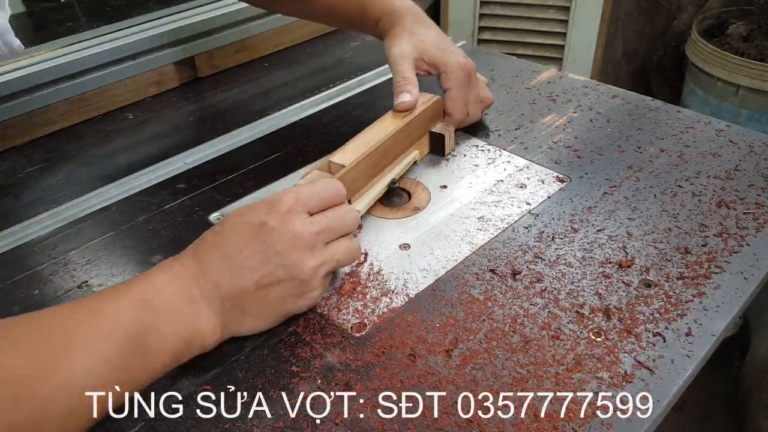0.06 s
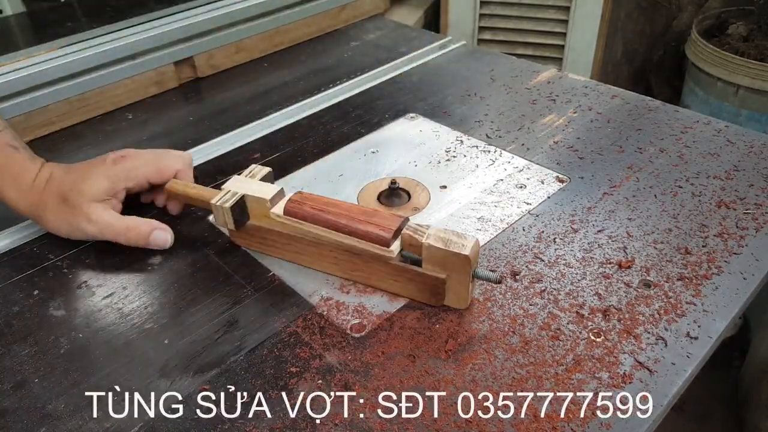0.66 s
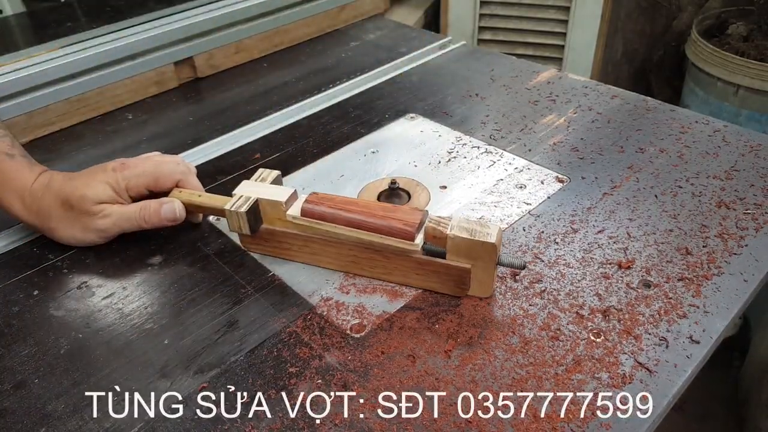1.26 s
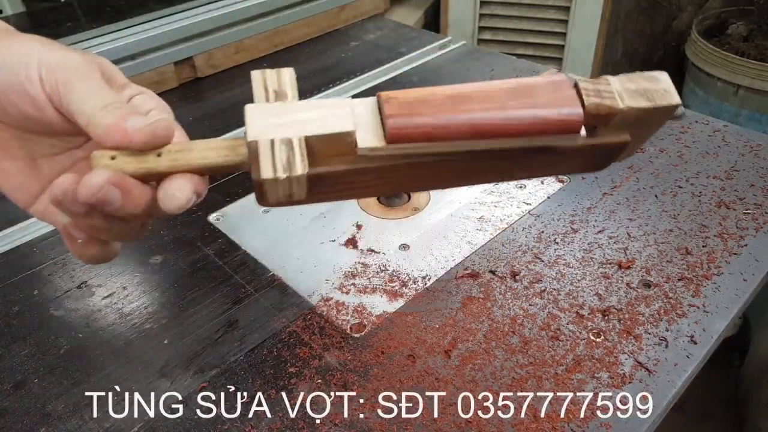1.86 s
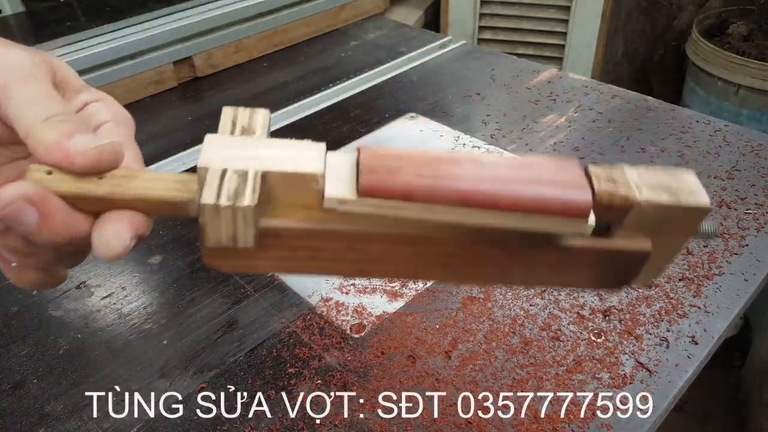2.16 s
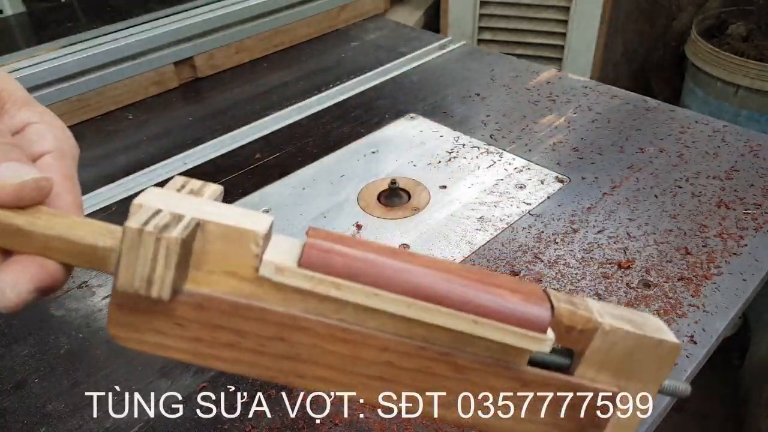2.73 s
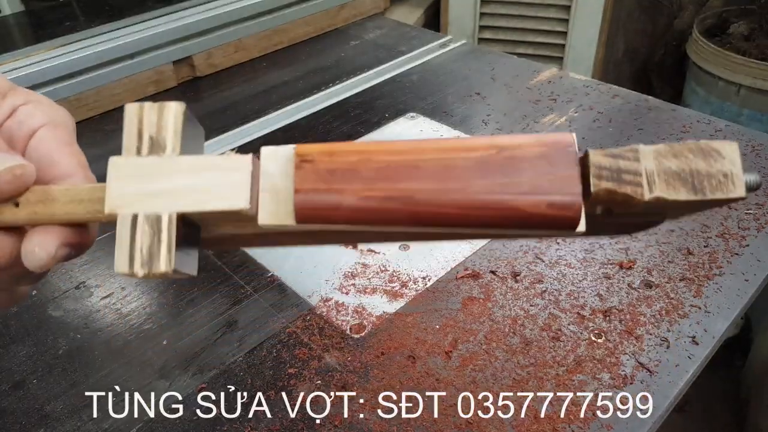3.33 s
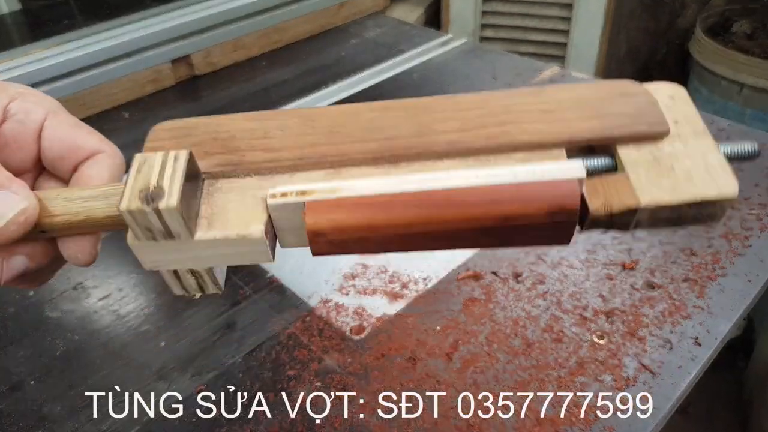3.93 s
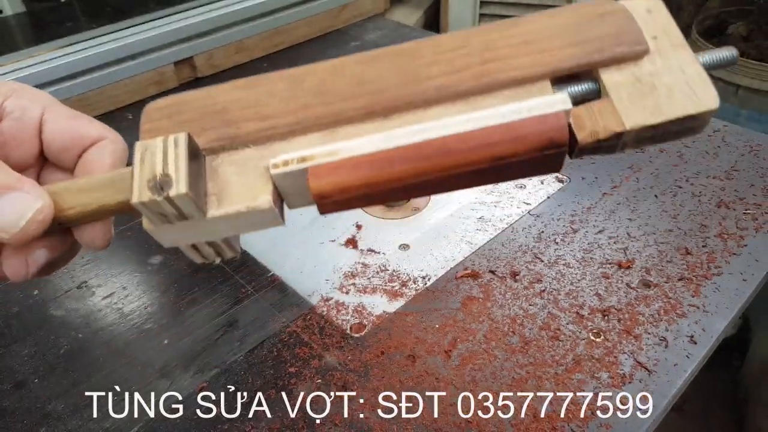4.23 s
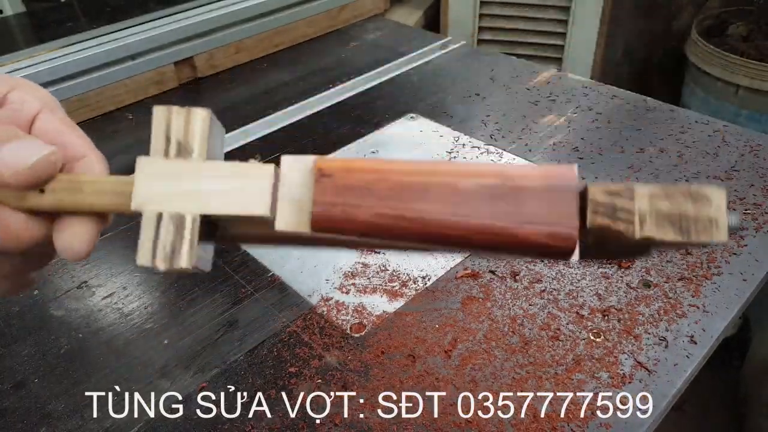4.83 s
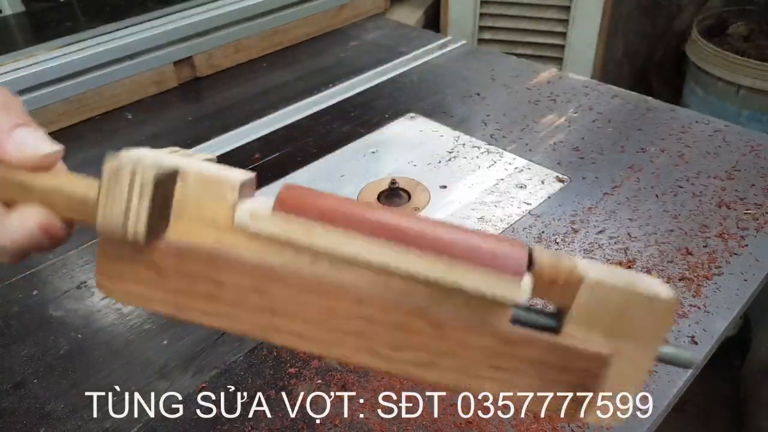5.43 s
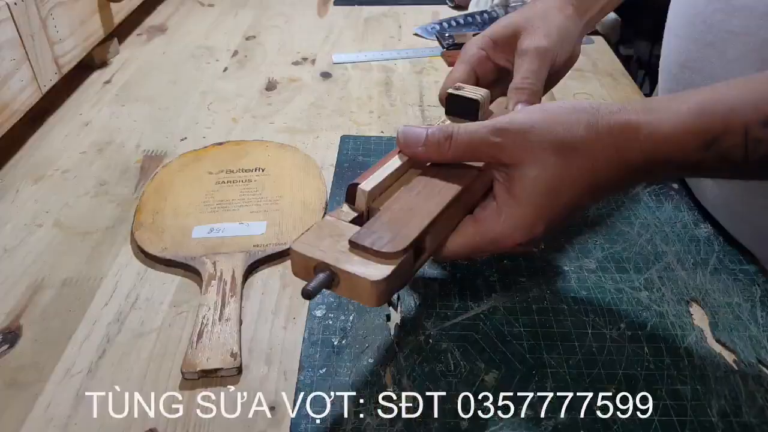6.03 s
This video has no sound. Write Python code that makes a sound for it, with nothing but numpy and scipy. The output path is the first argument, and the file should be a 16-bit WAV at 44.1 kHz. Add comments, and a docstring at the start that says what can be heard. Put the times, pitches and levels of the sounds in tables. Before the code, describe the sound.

In a workshop, a table-mounted router bites into hardwood with a brief, shrill buzz and squeal, then runs free with a steady hum and rushing fan air. It is switched off and coasts, its hum sinking in pitch over a dry, fading bearing hiss. Faint scrapes and a single wooden knock on the table follow, before the sound cuts to a quiet room with a few light taps. Heard close, in stereo.

```python
"""Workshop: a router under a table trims a hardwood strip, runs free and is switched off.
The bit strikes the wood once a turn, buzzing and squealing over shaft hum and fan air.
A jump to later in the spin-down: hum and ball-bearing tone sink through the table's resonances,
over a dry bearing rush and faint scrapes. The wooden jig knocks the table once.
A last jump lands in the quiet shop, with a few light handling taps."""
import sys
import numpy as np
from scipy import signal
from scipy.fft import rfft, irfft, next_fast_len
from scipy.io import wavfile

SR = 44100
rng = np.random.default_rng(int(sys.argv[2]) if len(sys.argv) > 2 else 0)


def file_out(sig):
    """Save sig as 16-bit WAV at sys.argv[1]."""
    # one column per channel
    cols = np.atleast_2d(sig).T
    # limit, then scale
    lim = np.clip(cols, -1, 1)
    pcm = np.round(lim * 32767).astype(np.int16)
    wavfile.write(sys.argv[1], SR, pcm)


N = 272960
TIME_S = np.arange(N) / SR
JUMP_TO_COAST_S, JUMP_TO_QUIET_S = 1.641, 6.067
# coasting: drive level at REF_SPEED_RPS, loss per halving of speed
REF_SPEED_RPS, SHAFT_DB = 200, -41
BALL_DB, BALL_LOSS_DB = -38.5, 17.5
FAN_DB, FAN_LOSS_DB = -54.5, 14
RUSH_DB, RUSH_LOSS_DB = -44.5, 12
HISS_DB, HISS_LOSS_DB, SIZZLE_LOSS_DB = -46, 11, 3.5
BALL_PASSES_PER_TURN, FAN_BLADES = 3.086, 11

# shaft, powered to just past switch-off: time_s, speed_rps
RUN_SPEED_CURVE = [(0, 416.5), (.27, 413.8), (.55, 427.6), (.9, 432.9), (1.31, 435.5), (1.4, 416),
                   (1.46, 395.5), (1.64, 341)]
# shaft hum, swelling as the speed starts to fall: time_s, level_db
RUN_HUM_CURVE = [(0, -38.5), (.26, -40.5), (.5, -42.5), (.72, -39), (1.35, -38), (1.47, -30), (1.51, -32),
                 (1.56, -37.5), (1.64, -42)]
# hum overtones: cycles_per_turn, free_db, cutting_db, flutter_db
HUM_OVERTONES = [(2, -58.5, -54, 2), (3, -50.5, -45.5, 5), (4, -51.5, -50.5, 3.5), (5, -59.5, -55, 3.5)]
# weak whines under power: cycles_per_turn, level_db
RUN_WHINES = [(3.086, -62), (6, -60), (10, -73), (11, -63.5)]
# fan air, up as the jig uncovers the opening, down after switch-off: time_s, level_db
AIR_CURVE = [(0.31, -49), (0.45, -45.5), (0.68, -42), (1.34, -42.5), (1.5, -44.5), (1.64, -45)]
# fan air: freq_hz, gain_db
AIR_SPECTRUM = [(20, -15), (60, -15), (130, -14.5), (300, -2.5), (450, 4), (600, -2), (1200, 1.5),
                (1900, -1.5), (2600, 1.5), (4100, 4), (4800, 0.5), (6300, -4), (9000, -2.5), (12500, -3.5),
                (15500, -8)]
# cutting buzz: time_s, level_db
BUZZ_CURVE = [(0.0, -47.5), (0.024, -35.5), (0.074, -45), (0.108, -40.5), (0.158, -45), (0.27, -42.5),
              (0.284, -62.5)]
# cutting buzz: freq_hz, gain_db
BUZZ_SPECTRUM = [(2200, -2), (2900, -6), (3700, 6), (4400, -4), (5000, 9.5), (6200, 1), (7400, 4),
                 (8300, 6.5), (10000, -2), (11600, -5), (12600, -15), (14000, -16), (15600, -13)]
# resonances the cutter sets squealing: pitch_hz, width_hz, level_db, peak_s, sigma_s
SQUEAL_MODES = [(3010, 130, -41.5, 0.069, 0.053), (5540, 300, -45, 0.081, 0.029),
                (7000, 270, -58, 0.085, 0.016), (9100, 300, -37, 0.11, 0.027),
                (10620, 240, -39, 0.14, .025), (9240, 400, -36.5, 0.23, 0.036),
                (10500, 270, -35, 0.273, 0.039)]

# shaft, coasting: time_s, speed_rps
COAST_SPEED_CURVE = [(1.64, 304.6), (2, 287), (2.5, 263), (3, 241), (3.5, 219), (4, 199), (4.5, 180.3),
                     (5, 161), (5.5, 143.3), (6.07, 121.8)]
# shaft chatter in the bearings: time_s, gain_db
CHATTER_CURVE = [(1.7, 6.5), (1.84, 4.5), (2.0, -1.5), (2.6, -5), (4.2, -5.5), (4.5, 5), (5.35, 2.5),
                 (5.75, -4), (6.05, -9.5)]
# chatter overtones: cycles_per_turn, level_db
CHATTER_OVERTONES = [(2, -48.5), (3, -45), (4, -46), (5, -50.5), (6, -52)]
# weak bearing tones: cycles_per_turn, level_db
BEARING_LINES = [(2.086, -58), (4.086, -59.5), (5.086, -83), (6.172, -58), (10.258, -60.5)]
# table and cabinet resonances: centre_hz, width_hz, gain_db
TABLE_RESONANCES = [(120, 22, 8.5), (153, 14, -2.5), (185, 12.5, 1.5), (212, 13, 4.5), (244.6, 7, 4.5),
                    (274.3, 39, 5.5), (357.5, 43, 5.5), (403, 34, 9.5), (532, 23, -4), (600.7, 38, 3.5),
                    (692, 46, 1.5), (765, 19, 6), (872, 19.4, -2), (1400, 99, 5.5)]
# cancellations by reflection: centre_hz, width_hz, loss_db
TABLE_NULLS = [(146, 1.2, 15), (172.4, 6.9, 10), (430.3, 4.9, 10), (604, 14.4, 11), (738.8, 6.4, 15)]
# bearing rush: freq_hz, gain_db
RUSH_SPECTRUM = [(900, -7), (1200, -13.5), (1470, -4.5), (1700, -6), (1920, -3.5), (2250, 1), (2600, -2.5),
                 (2950, -5.5), (3300, -5), (3800, -8.5), (4400, -10), (5700, -33)]
# bearing rasp: cycles_per_turn, half_width_hz, re_rush_db
RASP_BANDS = [(8.2, 180, -11), (18.1, 320, -9)]
# housing ring: time_s, level_db
HOUSING_CURVE = [(1.67, -42.5), (2.1, -42.5), (2.9, -47), (3.3, -51.5), (4.3, -54), (5.4, -57), (6.04, -66)]
# housing ring: freq_hz, gain_db
HOUSING_SPECTRUM = [(3800, -23), (4350, -7), (4800, 3), (5050, -0.5), (5250, 5.5), (5450, 2.5), (5800, -1),
                    (6600, -6)]
# bearing hiss: freq_hz, gain_db
HISS_SPECTRUM = [(3350, -38), (5700, -11), (6650, -5.5), (9230, -2.5), (10400, 0), (13000, -3.5),
                 (15100, -4), (15800, 0.5)]
# thin bearing whistles at full hiss: cycles_per_turn, level_db
BEARING_WHISTLES = [(36, -61), (41, -58), (44, -59.5), (47, -60), (53, -59), (56, -56), (72, -59)]
# insert plate rung by bearing sizzle: pitch_hz, width_hz, level_at_ref_speed_db
PLATE_MODES = [(10500, 100, -61), (11600, 230, -58), (15400, 500, -57)]
# motor housing and insert plate resonances: centre_hz, width_hz, lift_db
BODY_RESONANCES = [(1220, 31, 14.5), (1376, 68, 6.5), (1835, 50, 6.5), (2030, 50, 6.5), (2107, 43, 4.5),
                   (2475, 54, 3), (2694, 37, 7.5), (2894, 46, 5.5), (2975, 40, 5.5), (3670, 72, 3.5),
                   (4087, 90, 8), (4730, 64, 5.5), (4940, 76, 6), (5060, 80, 6)]
# low table noise: freq_hz, gain_db
TABLE_SPECTRUM = [(25, -24), (55, -13.5), (85, -11), (110, 3.5), (140, -7), (200, -4.5), (400, -1.5),
                  (600, 0.5), (900, 0), (1200, -8.5), (1700, -1.5)]

# jig contacts with the table: start_s, impulse_db, brightness_hz
JIG_CONTACTS = [(5.902, -33, 1100), (5.909, -57, 800), (5.927, -49, 700)]
# jig and table top: pitch_hz, gain_db, t60_s
JIG_MODES = [(410, 4, 0.046), (487, 6, 0.049), (623, 4.5, 0.076), (777, -7, 0.12), (1000, -4, 0.04),
             (1900, -16, .02), (2850, -12, .015)]
# faint scrapes: peak_s, level_db, sigma_s
SCRAPE_EVENTS = [(5.242, -45.5, 0.01), (5.298, -48, 0.024), (5.40, -50, 0.0092), (5.485, -47, 0.039),
                 (5.60, -48, .014), (5.705, -47, 0.0087)]
# scrape ring: pitch_hz, width_hz, relative_db
SCRAPE_RESONANCES = [(4390, 70, 16), (4600, 200, -3), (5000, 120, 3), (5300, 110, 7)]
# handling taps: start_s, level_db, decay_s
TAP_EVENTS = [(6.069, -41, 0.0086), (6.096, -48, .005), (6.122, -41, 0.0088), (6.132, -47.5, 0.0068),
              (6.176, -45, 0.015)]
# handling taps: freq_hz, gain_db
TAP_SPECTRUM = [(200, -8), (1000, 2), (1900, 0), (2500, -3), (4000, -7), (6000, -18), (9000, -11),
                (11000, -15), (13500, -11), (15000, -25)]
# room noise: freq_hz, gain_db
ROOM_SPECTRUM = [(25, -15), (110, 6), (250, -9), (500, -2), (1000, -11), (2000, -13), (4000, -24),
                 (7000, -37), (15000, -38)]
# left-right likeness: freq_hz, correlation
STEREO_CORRELATION = [(60, 1), (130, 0.5), (290, 0.64), (640, -0.23), (1400, -0.051), (15000, 0.034)]
# balance: freq_hz, left_minus_right_db
STEREO_BALANCE = [(110, 0.5), (250, .5), (280, -4.5), (312, 5), (345, -10.5), (385, 0), (430, -11),
                  (520, -3.5), (700, -0.5), (780, 5), (870, -10), (960, -2.5), (1300, -2), (2400, -3),
                  (4400, -4), (8100, -5), (15000, -8.5)]
# tone phase between the sides: freq_hz, left_lead_rad
STEREO_PHASE = [(120, -.2), (210, 0), (290, -.55), (335, -2), (385, -.5), (430, -1.06), (560, -.3),
                (700, -1.1), (780, -0.65), (870, -2.6), (1400, -2.18), (5000, 0.06)]


def running_router():
    """Shaft hum, fluttering overtones, whines that ring the housing, fan air and the end of the cut."""
    speed_rps = curve(RUN_SPEED_CURVE)
    air_db = curve(AIR_CURVE)
    covered_db = air_db - air_db.max()
    in_wood = until(0.27, fade_s=0.11)
    hum = shaft_tone(speed_rps, 1, curve(RUN_HUM_CURVE), waver_db=0.84)
    for per_turn, free_db, cutting_db, flutter_db in HUM_OVERTONES:
        running_free_db = free_db + 2.3 * covered_db  # 2.3 dB per dB of fan air
        level_db = in_wood * cutting_db + (1 - in_wood) * running_free_db
        hum += shaft_tone(speed_rps, per_turn, level_db, flutter_db)
    whines = motor_body(from_db(covered_db) * side_tones(speed_rps, RUN_WHINES, wet_db=-2.5))
    rush = rubbing(speed_rps, whine_db=-9.5, throb=0.14, harmonics=24)
    air = from_db(air_db) * coloured(rush, AIR_SPECTRUM)
    return hum + whines + air + cutting(speed_rps)


def cutting(speed_rps):
    """The edge strikes the wood once a turn; as the grip shifts, different resonances squeal."""
    turns = shaft_turns(speed_rps, jitter=0.0016, rate_hz=60)
    blows = turn_force(turns, scatter=0, harmonics=38) * from_db(drift(200) + drift(40))
    blows = reflections(blows, t60_s=0.014, wet_db=11)  # smeared by workpiece and plate
    buzz = from_db(curve(BUZZ_CURVE)) * coloured(blows, BUZZ_SPECTRUM)
    squeal = sum(from_db(db) * swell(peak_s, sigma_s) * resonance(blows, hz, width_hz)
                 for hz, width_hz, db, peak_s, sigma_s in SQUEAL_MODES)
    cut = (buzz + squeal) * until(0.275, fade_s=0.008)
    feed_bump = from_db(-55) * swell(peak_s=0.105, sigma_s=0.015) * np.sin(2 * np.pi * 200 * TIME_S)
    return reflections(cut, t60_s=0.033, wet_db=-15) + feed_bump


def coasting_router():
    """Bearing rush, fan tone, housing ring, hiss and sizzle fade over the hum and steady table noise."""
    speed_rps = curve(COAST_SPEED_CURVE)
    halvings = np.log2(REF_SPEED_RPS / speed_rps)
    rub = rubbing(speed_rps, whine_db=-6.5, throb=0.16, harmonics=50) * from_db(1.08 * drift(27))
    rasps = sum(from_db(db) * bearing_rasp(speed_rps, per_turn, half_width_hz)
                for per_turn, half_width_hz, db in RASP_BANDS)
    rush = from_db(RUSH_DB - RUSH_LOSS_DB * halvings) * (coloured(rub, RUSH_SPECTRUM) + rasps)
    fan = shaft_tone(speed_rps, FAN_BLADES, FAN_DB - FAN_LOSS_DB * halvings, waver_db=4)
    housing = from_db(curve(HOUSING_CURVE)) * coloured(rub, HOUSING_SPECTRUM)

    fine_rub = rubbing(speed_rps, whine_db=-4, throb=0.2, harmonics=90)
    hiss_db = HISS_DB - HISS_LOSS_DB * halvings
    hiss = from_db(hiss_db) * coloured(fine_rub, HISS_SPECTRUM)
    sizzle = from_db(-SIZZLE_LOSS_DB * halvings) * ring_modes(fine_rub, PLATE_MODES)
    whistles = side_tones(speed_rps, BEARING_WHISTLES, wet_db=-46)
    whistles *= from_db(hiss_db - hiss_db.max()) * pan(HISS_SPECTRUM[-1][0])

    motor = motor_body(fan + rush + housing + hiss + whistles)
    table_noise = from_db(-44.5) * coloured(white(), TABLE_SPECTRUM)
    return coasting_hum(speed_rps, halvings) + motor + sizzle + table_noise


def coasting_hum(speed_rps, halvings):
    """Shaft, ball-pass and chatter tones swell and fade as they sink through the table's resonances."""
    def through_table(per_turn, level_db, waver_db):
        return shaft_tone(speed_rps, per_turn, level_db + table_gain_db(per_turn * speed_rps), waver_db)
    chatter_db = curve(CHATTER_CURVE)
    shaft = through_table(1, SHAFT_DB, waver_db=1.5)
    ball = through_table(BALL_PASSES_PER_TURN, BALL_DB - BALL_LOSS_DB * halvings, waver_db=1.9)
    chatter = sum(through_table(per_turn, db + chatter_db, waver_db=2.5)
                  for per_turn, db in CHATTER_OVERTONES)
    return shaft + ball + chatter + side_tones(speed_rps, BEARING_LINES, wet_db=1.5)


def shaft_tone(speed_rps, per_turn, level_db, waver_db):
    """A line locked to the shaft; its stereo position shifts as it sweeps."""
    hz = per_turn * speed_rps
    phase_rad = 2 * np.pi * (np.cumsum(hz) / SR + rng.random())
    block_hz = hz[::32]
    position = pan(block_hz) * np.exp(1j * at_hz(STEREO_PHASE, block_hz) * [[0.5], [-0.5]])
    position = np.repeat(position, 32, axis=1)[:, :N]
    amplitude = np.sqrt(2) * from_db(level_db + waver_db * drift(8.1))
    return amplitude * np.real(position * np.exp(1j * phase_rad))


def side_tones(speed_rps, lines, wet_db):
    """Weak, unsteady tones; reflections make them waver as they move."""
    angle_rad = 2 * np.pi * shaft_turns(speed_rps, jitter=0.00118, rate_hz=19.6)
    tones = sum(from_db(db) * np.sin(per_turn * angle_rad + 2 * np.pi * rng.random())
                for per_turn, db in lines)
    return reflections(tones, t60_s=0.44, wet_db=wet_db)


def rubbing(speed_rps, whine_db, throb, harmonics):
    """Rush that swells once a turn, plus a whine from roughness that comes round again."""
    turns = shaft_turns(speed_rps, jitter=0.000786, rate_hz=20.2)
    roughness = turn_force(turns, scatter=1, harmonics=harmonics)
    whine = unit_rms(reflections(roughness, t60_s=0.1, wet_db=35))
    return white() * (1 + throb * np.sin(2 * np.pi * turns)) + from_db(whine_db) * whine


def bearing_rasp(speed_rps, per_turn, half_width_hz):
    """Narrow band of bearing noise; its centre follows the shaft."""
    lowpass = signal.butter(2, half_width_hz, fs=SR, output="sos")
    baseband = signal.sosfilt(lowpass, white() + 1j * white())
    carrier = np.exp(2j * np.pi * per_turn * np.cumsum(speed_rps) / SR)
    return unit_rms(np.real(baseband * carrier)) * pan(per_turn * speed_rps.mean())


def shaft_turns(speed_rps, jitter, rate_hz):
    """Running turn count at a slightly unsteady speed."""
    return np.cumsum(speed_rps * (1 + jitter * drift(rate_hz))) / SR


def turn_force(turns, scatter, harmonics):
    """Force repeating each turn: a sharp blow at scatter 0, an uneven rub at 1."""
    spectrum = np.exp(2j * np.pi * scatter * rng.random(harmonics + 1))
    spectrum[0] = 0
    cycle = unit_rms(irfft(spectrum, 4096))
    return np.interp(turns % 1, np.linspace(0, 1, len(cycle)), cycle)


def motor_body(x):
    """Housing and plate lift their narrow resonances out of the drive."""
    for hz, width_hz, lift_db in BODY_RESONANCES:
        zero, pole = np.exp(-np.pi * width_hz / SR * np.array([from_db(lift_db), 1]))
        tuning = -2 * np.cos(2 * np.pi * hz / SR)
        x = signal.lfilter([1, tuning * zero, zero ** 2], [1, tuning * pole, pole ** 2], x)
    return x


def table_gain_db(hz):
    """Table response to a tone: resonances lift it, cancellations swallow it."""
    grid_hz, floor_db = np.geomspace(100, 2000, 1500), -7.5
    power = sum((from_db(db) / (1 + ((grid_hz - centre_hz) / width_hz) ** 2 * 5 / 3)) ** 2
                for centre_hz, width_hz, db in TABLE_RESONANCES)
    lift_db = np.interp(hz, grid_hz, 10 * np.log10(from_db(floor_db) ** 2 + power))
    loss_db = sum(db / (1 + (2 * (hz - centre_hz) / width_hz) ** 2)
                  for centre_hz, width_hz, db in TABLE_NULLS)
    return lift_db - loss_db


def jig_knock():
    """Blunt wooden contacts ring the jig and table top."""
    force = np.full(N, 1e-18)
    for start_s, impulse_db, brightness_hz in JIG_CONTACTS:
        age_s = np.clip(TIME_S - start_s, 0, 0.01)
        decay_per_s = 2 * np.pi * brightness_hz
        force += from_db(impulse_db) * decay_per_s / SR * np.exp(-decay_per_s * age_s) * (age_s > 0)
    wood = np.zeros(N)
    for k, (hz, gain_db, t60_s) in enumerate(JIG_MODES):
        radius = from_db(-60 / (t60_s * SR))
        wood += (-1) ** k * from_db(gain_db) * signal.lfilter([1, -1], pole_pair(hz, radius), force)
    return reflections(wood, t60_s=0.15, wet_db=-11)


def scrapes():
    """Short uneven rubs ring a few high resonances."""
    ringing = unit_rms(ring_modes(white(), SCRAPE_RESONANCES))
    envelope = sum(from_db(db) * swell(peak_s, sigma_s) for peak_s, db, sigma_s in SCRAPE_EVENTS)
    return ringing * from_db(1.3 * drift(60)) * envelope


def quiet_shop():
    """Room noise and short scuffing taps of things being handled."""
    room = from_db(-50) * coloured(white(), ROOM_SPECTRUM)
    tap_envelope = sum(from_db(db) * np.exp(-np.maximum(TIME_S - start_s, 0) / decay_s)
                       * (TIME_S > start_s) for start_s, db, decay_s in TAP_EVENTS)
    return room + tap_envelope * coloured(white(), TAP_SPECTRUM)


def reflections(x, t60_s, wet_db):
    """Direct sound plus dense echoes off table and walls, different per side."""
    delay_s = TIME_S[:SR // 2]
    echoes = rng.standard_normal((2, len(delay_s))) * from_db(-60 * delay_s / t60_s)
    echoes *= from_db(wet_db) / np.sqrt(np.sum(echoes ** 2, axis=1, keepdims=True))
    return x + signal.fftconvolve(np.atleast_2d(x), echoes, axes=1)[:, :N]


def ring_modes(x, modes):
    """Parallel resonances on one drive."""
    return sum(from_db(db) * resonance(x, hz, width_hz) for hz, width_hz, db in modes)


def resonance(x, hz, width_hz):
    """One resonance, normalised, then panned by pitch."""
    radius = np.exp(-np.pi * width_hz / SR)
    return unit_rms(signal.lfilter([1, 0, -1], pole_pair(hz, radius), x)) * pan(hz)


def pole_pair(hz, radius):
    """Resonator denominator."""
    return [1, -2 * radius * np.cos(2 * np.pi * hz / SR), radius ** 2]


def coloured(pair, spectrum):
    """Two unrelated signals to one stereo sound shaped by a spectrum; rms 1."""
    size = next_fast_len(N, real=True)
    hz = np.arange(size // 2 + 1) * SR / size
    mid, side = rfft(pair, size)
    correlation = np.clip(at_hz(STEREO_CORRELATION, hz), -1, 1)
    stereo = np.sqrt(1 + correlation) * mid + np.sqrt(1 - correlation) * side * [[1], [-1]]
    low_hz, high_hz = spectrum[0][0], spectrum[-1][0]
    skirts = 1 / np.sqrt((1 + (low_hz / (hz + 1)) ** 8) * (1 + (hz / high_hz) ** 40))
    gain = pan(hz) * skirts * from_db(at_hz(spectrum, hz))
    return unit_rms(irfft(stereo * gain, size)[:, :N])


def pan(hz):
    """Left and right gain rows; mean power 1."""
    ratio = from_db(at_hz(STEREO_BALANCE, hz))
    return np.vstack([ratio, np.ones_like(ratio)]) * np.sqrt(2 / (1 + ratio ** 2))


def drift(rate_hz):
    """Slow random wander; rms 1."""
    step, settle = 40, 2000
    radius = np.exp(-2 * np.pi * rate_hz * step / SR)
    noise = rng.standard_normal(N // step + settle + 2)
    slow = signal.lfilter([1], pole_pair(0, radius), noise)[settle:]
    return np.interp(np.arange(N) / step, np.arange(len(slow)), unit_rms(slow))


def swell(peak_s, sigma_s):
    """Gaussian envelope."""
    return np.exp(-0.5 * np.minimum(((TIME_S - peak_s) / sigma_s) ** 2, 100))


def until(end_s, fade_s=0.00047):
    """Gate: 1, then 0."""
    return np.clip((end_s - TIME_S) / fade_s + 0.5, 0, 1)


def curve(points):
    """Time table, read per sample."""
    return np.interp(TIME_S, *np.transpose(points))


def at_hz(points, hz):
    """Frequency table, read on a log axis."""
    freq_hz, value = np.transpose(points)
    return np.interp(np.log(np.maximum(hz, 1)), np.log(freq_hz), value)


def white():
    """Two unrelated white noises."""
    return rng.standard_normal((2, N))


def from_db(db):
    """Decibels to gain."""
    return np.exp(np.asarray(db) * (np.log(10) / 20))


def unit_rms(x):
    """Scale to rms 1."""
    return x / np.sqrt(np.mean(x ** 2) + 1e-20)


def scene():
    """Run, spin-down and quiet shop, joined by sudden jumps."""
    before_coast, before_quiet = until(JUMP_TO_COAST_S), until(JUMP_TO_QUIET_S)
    run = before_coast * running_router()
    spin_down = (before_quiet - before_coast) * (coasting_router() + jig_knock() + scrapes())
    return run + spin_down + (1 - before_quiet) * quiet_shop()


def record(dry):
    """Steep low-pass at 15760 Hz."""
    return signal.sosfilt(signal.ellip(12, 0.1, 90, 15760, fs=SR, output="sos"), dry)


dry = scene()
out = record(dry)
file_out(out)
```